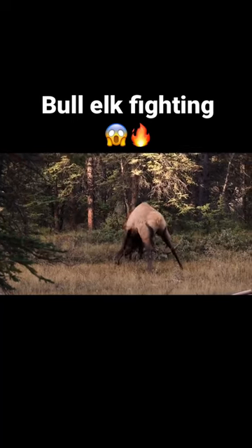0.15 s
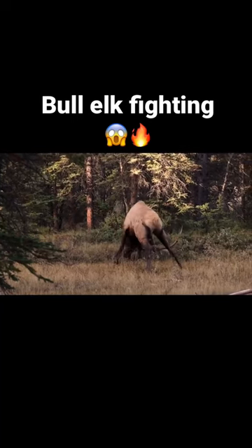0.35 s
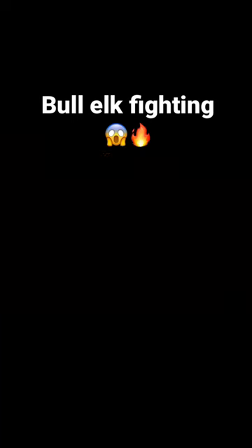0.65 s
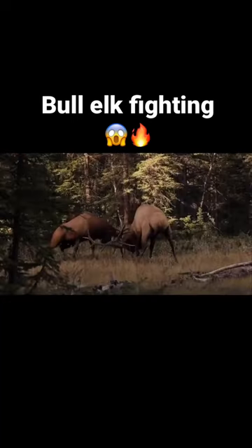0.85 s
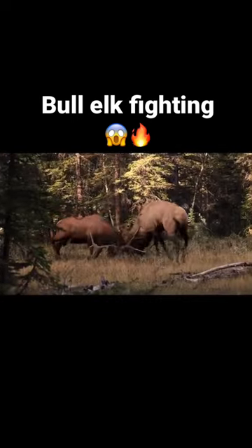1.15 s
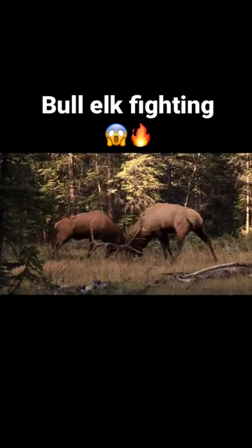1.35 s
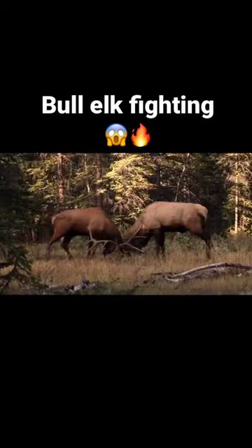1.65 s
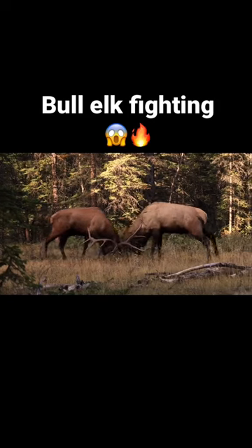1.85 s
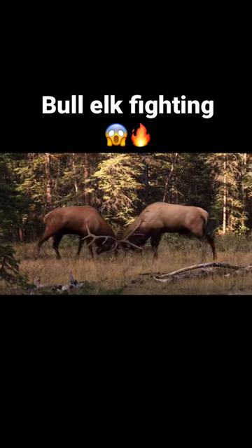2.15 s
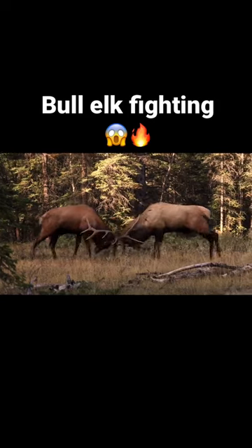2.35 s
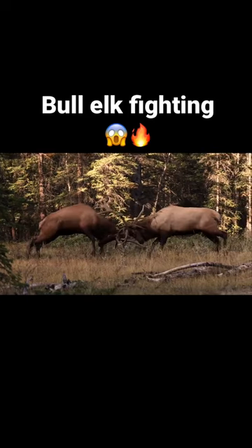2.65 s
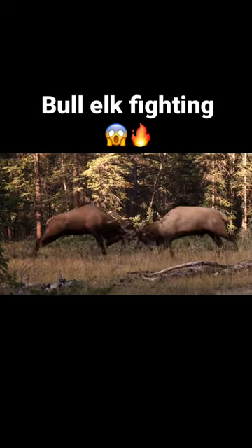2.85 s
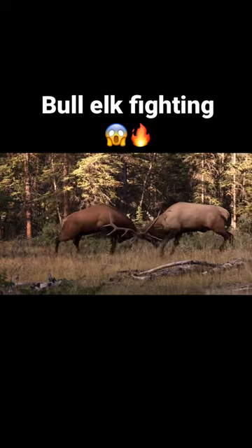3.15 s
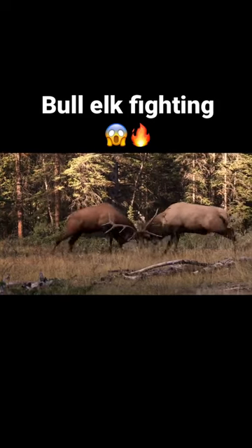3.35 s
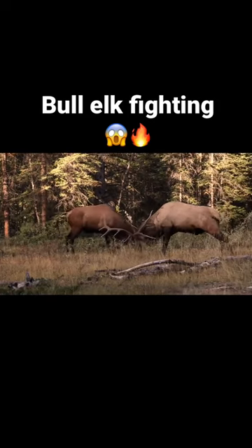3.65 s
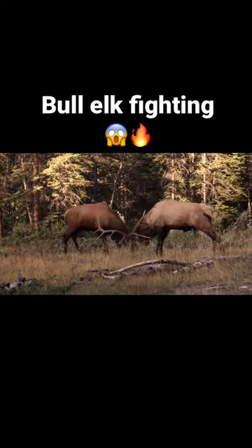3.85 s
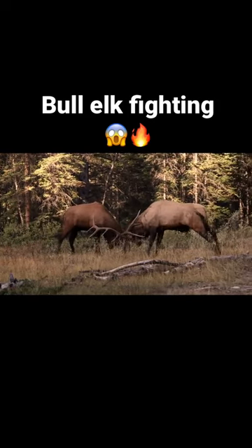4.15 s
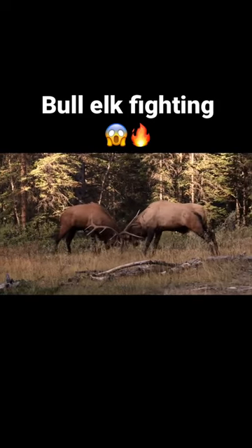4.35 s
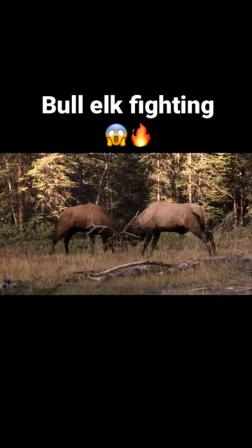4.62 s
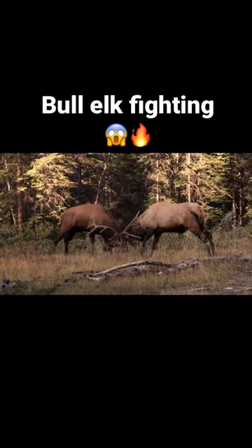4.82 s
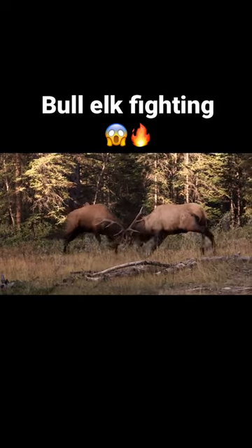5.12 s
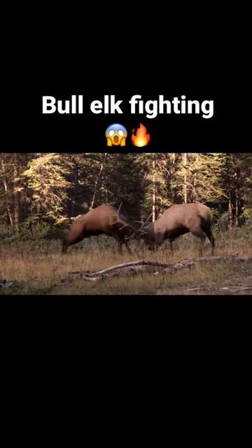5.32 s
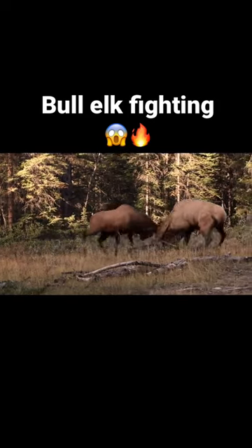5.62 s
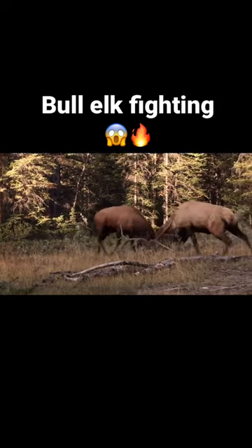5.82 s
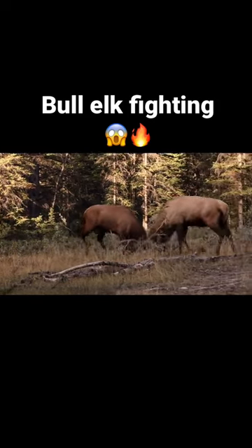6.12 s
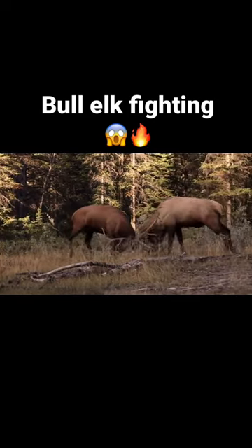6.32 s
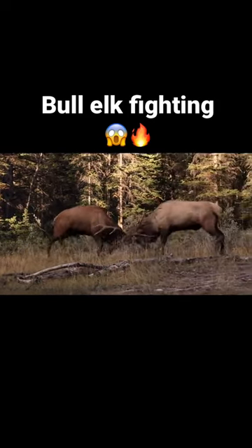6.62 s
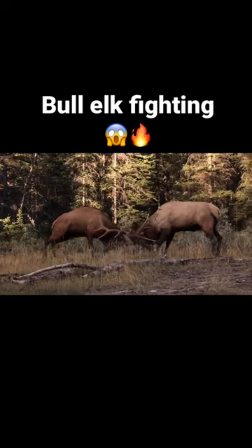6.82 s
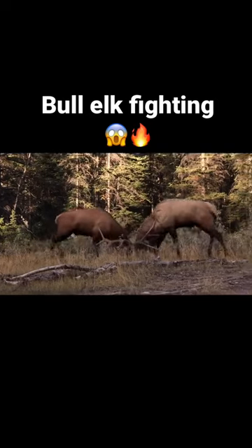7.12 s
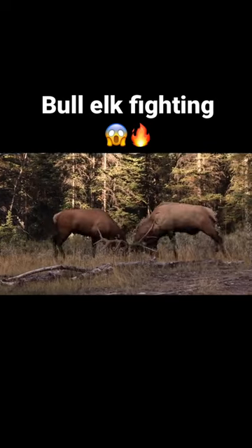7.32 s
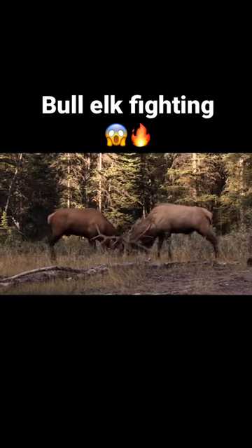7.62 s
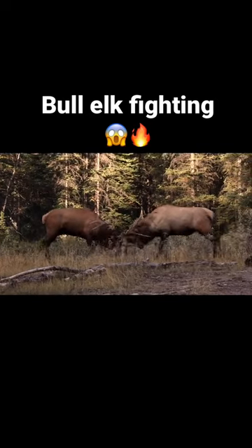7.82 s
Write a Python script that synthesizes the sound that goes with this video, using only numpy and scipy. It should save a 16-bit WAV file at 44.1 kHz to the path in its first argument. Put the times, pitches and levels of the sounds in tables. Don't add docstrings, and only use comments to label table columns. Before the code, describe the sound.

Two bull elk spar with locked antlers, hard bony clacks and rattles bursting in clusters, echoing off forest trees over faint grass rustle and low rumble.

```python
import sys
import numpy as np
from scipy import signal
from scipy.fft import rfft, irfft
from scipy.io import wavfile
from scipy.ndimage import uniform_filter1d

SR = 44100
rng = np.random.default_rng(int(sys.argv[2]) if len(sys.argv) > 2 else 0)


def boost_factor(decibels):
    exponent = np.asarray(decibels, float) / 20
    return 10 ** exponent


def dump_mix(stems):
    frames = np.atleast_2d(stems).T
    limited = np.clip(frames, -1, 1)
    pcm = np.round(limited * 32767).astype(np.int16)
    wavfile.write(sys.argv[1], SR, pcm)


N = 351477


def rms_one(x):
    return x / np.sqrt(np.mean(x ** 2) + 1e-20)


def at_hz(points, hz):
    points = np.array(points)
    return np.interp(np.log(hz), np.log(points[:, 0]), points[:, 1])


def fall(t, t60):
    return boost_factor(-60 * t / t60)


def drift(rate):
    pole = np.exp(-80 * np.pi * rate / SR)
    white = rng.standard_normal(N // 40 + 2002)
    slow = signal.lfilter([1], [1, -2 * pole, pole * pole], white)[2000:]
    return np.interp(np.arange(N) / 40, np.arange(len(slow)), rms_one(slow))


def bands(x, low_hz, high_hz):
    edges = low_hz * 2 ** np.arange(0, np.log2(high_hz / low_hz) + 1 / 3, 1 / 3)
    for k, (low, high) in enumerate(zip(edges, edges[1:])):
        sos = signal.butter(2, [low, high], "band", fs=SR, output="sos")
        yield np.sqrt(low * high), signal.sosfilt(sos, x[k % 2])


def coloured(x, spectrum):
    hz = np.maximum(np.arange(len(x) // 2 + 1) * SR / len(x), 1)
    return irfft(rfft(x) * boost_factor(at_hz(spectrum, hz)), len(x))


def patchy(source, spectrum, low_hz, high_hz, patchy_db, rate):
    together = drift(rate / 2)
    bed = 0
    for hz, band in bands(source, low_hz, high_hz):
        flicker_db = patchy_db * (0.86 * together + drift(rate))
        bed = bed + boost_factor(at_hz(spectrum, hz) + flicker_db) * band
    return rms_one(bed)


def crackle(per_s, spread_db):
    sizes = boost_factor(spread_db * np.minimum(rng.exponential(1, (2, N)), 5))
    signs = rng.choice([-1, 1], (2, N))
    happens = rng.random((2, N)) < per_s * boost_factor(5 * drift(9)) / SR
    return rms_one(sizes * signs * happens) + rng.standard_normal((2, N))


def add(out, s, sound):
    i = round(s * SR)
    out[i:i + len(sound)] += sound[:N - i]


def ground_levels():
    # time in seconds, trampling level in dB.
    surge = [(0, -29), (.62, -39.5), (1.15, -45), (1.53, -35.5), (1.87, -37.5), (2.34, -40.5),
             (2.55, -24.5), (2.72, -42), (3.33, -32.5), (4.55, -45), (4.93, -38.5), (5.06, -26.5),
             (6.12, -34.5), (6.74, -31.5), (6.8, -38.5), (7.05, -42), (7.3, -28.5), (7.97, -29.5)]
    # start and end in seconds, hiss gain and rumble gain in dB.
    stretches = [
        (0, 0.58, 4.5, 2.5),
        (1.47, 1.85, 2, -0.5),
        (2.42, 2.605, 7, -2.5),
        (2.92, 3.15, 1.5, -1),
        (4.536, 5.298, 6, 0.5),
        (5.3, 6.74, 8.5, 5),
        (6.758, 7.24, 2, 1),
        (7.242, 7.653, 9, 7),
    ]
    t = np.arange(N) / SR
    surge_db = np.interp(t, *np.transpose(surge))
    above_rest_db = surge_db + 40
    hiss_db, ground_db = sum(np.outer(gains, (t >= start) & (t < end)) for start, end, *gains in stretches)
    rumble_db = -41.5 + 0.29 * above_rest_db + uniform_filter1d(ground_db, size=1000)
    grass_db = -63 + 0.1 * above_rest_db + uniform_filter1d(hiss_db, size=1000)
    return rumble_db, surge_db, grass_db


def far_rumble(level_db):
    # frequency in Hz, spectral density in dB per Hz.
    rumble_colour = [(20, -6.5), (50, -8.5), (110, 0.5), (140, -3.5), (400, -5.5), (700, -10),
                     (1500, -33.5)]
    noise = rng.standard_normal((2, N))
    return boost_factor(level_db) * patchy(noise, rumble_colour, 20.06, 1500, patchy_db=3.0, rate=13)


def trampling(level_db):
    # frequency in Hz, spectral density in dB per Hz.
    trample_colour = [(400, -23.5), (800, -3), (1700, -5), (2300, -11.5), (4000, -12), (4700, -76)]
    crunch = crackle(700, 2.3)
    return boost_factor(level_db - 8) * patchy(crunch, trample_colour, 388.3, 4600, patchy_db=2.6, rate=9.7)


def grass_hiss(level_db):
    # frequency in Hz, spectral density in dB per Hz.
    grass_colour = [(4200, 0), (5000, -0.5), (6500, 1), (8000, -3.5), (10000, -3.5)]
    rustle = crackle(1800, 1.8)
    return boost_factor(level_db - 4) * patchy(rustle, grass_colour, 4200, 10500, patchy_db=0.3, rate=14)


def light_touches(rows, t60, crack_db):
    return [(s, db, hz, hz * (1.55 if hz < 2250 else 0.67), t60, crack_db) for s, db, hz in rows]


def shaft_blows(rows):
    rebounds = [(s + 0.016, db - 10.5, 0.92 * hz, 0.92 * other_hz, t60)
                for s, db, hz, other_hz, t60 in rows]
    return [(*row, -36 + row[1]) for row in rows + rebounds]


def grinding_slips(rows):
    slip_s, spread_db, pitch_spread = 0.0225, 3, 0.14
    slips = []
    for (s, length, db, hz), luck in zip(rows, rng.uniform(-1, 1, (len(rows), 8, 2))):
        for late, (a, b) in zip(np.arange(0, length, slip_s), luck):
            slips.append((s + late, db + spread_db * a, hz * (1 + pitch_spread * b)))
    return slips


def contacts():
    # time in seconds, peak in dB, ring in Hz.
    taps = [(.11, -16, 1665), (.154, -13, 990), (.491, -21.5, 786), (1.343, -20.5, 2130),
            (1.935, -24.5, 1530), (2.363, -22.5, 1660), (2.544, -18.5, 1790), (2.984, -24.5, 1405),
            (3.024, -19.5, 1160), (3.085, -14.5, 980), (3.178, -14, 1440), (3.279, -4, 1700),
            (4.06, -28, 900), (4.386, -28, 1107), (4.83, -30.5, 2230), (5.41, -16, 1350), (5.545, -9, 2394),
            (2.468, -11, 2250), (5.613, -13, 1390), (5.884, -16, 2430), (6.1, -17.5, 1510),
            (6.143, -12.5, 1260), (6.463, -27, 1000), (6.75, -22, 1450), (6.962, -24, 1106),
            (7.034, -23, 1670), (7.109, -18.5, 1357), (7.148, -21, 1050), (7.845, -23.5, 1374)]
    # time in seconds, peak in dB, ring in Hz.
    ticks = [(.194, -27.5, 2780), (.703, -26.5, 3040), (.734, -29.5, 3190), (.745, -27.5, 3710),
             (1.494, -23, 1460), (1.516, -34, 1500), (1.66, -16, 1834), (2.049, -22, 1812),
             (2.35, -26, 1155), (2.919, -18.5, 1485), (3.353, -19.5, 1360), (4.679, -29.5, 3220),
             (5.633, -13.5, 1270), (5.922, -19.5, 750), (6.13, -15.5, 924), (6.475, -28, 940),
             (6.585, -26, 1780), (6.691, -20.5, 3060), (6.706, -28.5, 910), (6.73, -18.5, 3236),
             (7.135, -23.5, 1124), (7.548, -20.5, 1270)]
    # start and length in seconds, peak in dB, ring in Hz.
    rattles = [
        (1.368, .08, -18.5, 2120),
        (2.488, .03, -15.5, 1840),
        (5.022, .03, -15, 1435),
        (5.504, .03, -11, 820),
        (7.425, .03, -13.5, 1120),
        (7.668, .03, -19.5, 1310),
        (7.759, .055, -18, 1290),
    ]
    # time in seconds, peak in dB, ring of one tine
    # and of the other in Hz, t60 in seconds.
    knocks = [(1.46, 0.5, 2900, 2470, 0.025), (1.619, -7.5, 1480, 2140, 0.038),
              (2.423, -4, 1980, 3565, 0.075), (3.207, -7.5, 1800, 1154, 0.093),
              (3.274, -0.5, 1656, 2840, 0.038), (5.247, -13, 1630, 565, 0.022),
              (5.359, -12.5, 2460, 1540, 0.018), (5.422, -2, 2036, 2730, 0.045),
              (5.469, -2, 2160, 1570, 0.033), (5.566, -8, 1678, 747, 0.055),
              (5.777, -10.5, 2060, 1480, 0.031), (7.29, -9, 2157, 820, 0.077),
              (7.303, -5, 1170, 1770, .075), (7.368, -7.5, 1440, 2080, 0.052),
              (7.391, -7, 1185, 2230, 0.058), (7.612, -8, 1374, 3090, 0.023)]
    # time in seconds, peak in dB, ring of one tine
    # and of the other in Hz, t60 in seconds.
    snaps = [(3.227, 2.5, 2056, 3310, 0.033), (4.901, 2.5, 3770, 1690, .03), (4.946, -9, 1510, 1930, .021),
             (4.958, -1, 2115, 1560, 0.011), (4.965, -2, 2150, 1360, 0.057), (4.984, -7, 1440, 2810, 0.042),
             (5.724, 2.5, 1694, 1250, 0.02), (5.902, -3.5, 2930, 1700, 0.026),
             (7.317, -2, 1056, 3110, 0.0986), (7.335, -3.5, 1190, 2230, .022),
             (7.352, -6.5, 3710, 2200, 0.033), (7.569, -2.5, 3350, 1480, 0.034),
             (7.587, -2, 1390, 2770, 0.047), (7.598, -5.5, 1280, 1990, 0.025)]
    # time in seconds, peak in dB, ring in Hz.
    twigs = [
        (4.726, -28, 2970),
        (4.756, -28.5, 2520),
        (5.289, -32, 1510),
        (6.925, -23.5, 1470),
        (7.828, -34, 2000),
    ]
    return ([(*row, -31.5) for row in snaps] + shaft_blows(knocks)
            + light_touches(ticks, 0.051, -34.5) + light_touches(taps, 0.041, -48)
            + light_touches(twigs, 0.0087, -17)
            + light_touches(grinding_slips(rattles), 0.087, -42.5))


def tine_rings(t, hz, other_hz, draw):
    stray_hz = 700 * 5.5 ** draw[:3]
    stray_level = boost_factor(-3.5 - 12 * draw[3:6])
    stray = stray_level @ np.sin(2 * np.pi * (stray_hz[:, None] * t + draw[6:, None]))
    return np.sin(2 * np.pi * hz * t) + boost_factor(-12.5) * np.sin(2 * np.pi * other_hz * t) + stray


def bone_splinter(rough, hz, other_hz):
    # frequency in Hz, level in dB.
    bone_colour = [(150, -34), (500, -5.5), (900, -5.5), (1500, -2), (2200, -8), (3000, -8.5),
                   (4000, -11.5), (4700, -29), (9000, -48)]
    near_tines = sum(signal.lfilter(*signal.iirpeak(f, 3.0, fs=SR), rough) for f in (hz, other_hz))
    return rms_one(coloured(rough + near_tines, bone_colour))


def onset_crack(t, sharp, chatter, t60):
    # frequency in Hz, level in dB.
    crack_colour = [(3600, -34), (4600, -0.5), (6500, -1.5), (8000, -8), (10500, -16.5)]
    snap = fall(t, 0.01) + boost_factor(-3) * chatter * fall(t, np.clip(1.6 * t60, .005, .1))
    return coloured(sharp, crack_colour) * snap


def antlers():
    out, t, hits = np.zeros((2, N)), np.arange(SR // 8) / SR, contacts()
    dull = signal.butter(6, 4500, "low", fs=SR, output="sos")
    luck, noise = rng.random((len(hits), 9)), rng.standard_normal((len(hits), 3, len(t)))
    for (s, peak_db, hz, other_hz, t60, crack_db), draw, (rough, sharp, lumps) in zip(hits, luck, noise):
        load_s = 0.00024 + 0.011 * t60 + 0.00005 * max(-peak_db, 0)
        rise = 1 - np.exp(-t / load_s)
        chatter = boost_factor(4.5 * rms_one(uniform_filter1d(lumps, size=50)))

        rings = tine_rings(t, hz, other_hz, draw) * rise * fall(t, np.clip(0.94 * t60, .008, .06))
        rings = signal.sosfilt(dull, rings)

        thin = signal.butter(2, 0.52 * min(hz, other_hz), "high", fs=SR, output="sos")
        splinter = bone_splinter(rough, hz, other_hz) * chatter * fall(t, np.clip(1.8 * t60, .008, .2))
        splinter = boost_factor(-7) * signal.sosfilt(np.vstack([dull, thin]), splinter * rise)

        crack = boost_factor(crack_db + 10.5) * onset_crack(t, sharp, chatter, t60)
        height = np.abs(rings + splinter).max()
        add(out[0], s - 0.916 * load_s, boost_factor(peak_db) * (rings + splinter) / height)
        add(out[0], s, boost_factor(peak_db) * crack)
        to_trees = (0.61 * rings + 1.12 * splinter) / height + boost_factor(2.5) * crack
        add(out[1], s, boost_factor(peak_db) * to_trees)
    return out


def thuds():
    # time in seconds, peak in dB, ring in Hz, t60 in seconds.
    beams = [(.156, -16.5, 283, 0.12), (1.345, -24.5, 445, 1), (1.41, -25, 446, .4),
             (1.615, -25.5, 296.5, 0.38), (2.057, -24.5, 418.5, 0.31), (2.487, -19, 380, .16),
             (2.919, -24, 330, 0.073), (3.083, -20, 458, 0.083), (3.172, -20.5, 427, 0.99),
             (3.27, -11, 411.8, 0.19), (3.315, -17.5, 420, 0.28), (4.049, -24.5, 348, .17),
             (4.898, -24, 238.5, 0.68), (4.959, -9, 290.7, 0.24), (5.105, -21, 216, 0.089),
             (5.24, -19.5, 285, 0.089), (5.355, -16, 315, 0.99), (5.402, -11.5, 238, 0.27),
             (5.52, -10.5, 477, 0.29), (5.563, -4.5, 285, 0.05), (5.619, -15, 310, 0.17),
             (5.921, -11, 381, 0.13), (6.145, -14.5, 283, 0.074), (7.285, -10, 266, .25),
             (7.313, -9.5, 375, 0.27), (7.337, -10, 314, 0.27), (7.453, -15.5, 386, 0.089),
             (7.589, -12.5, 400, 0.19), (7.771, -21, 376, 0.32)]
    # time in seconds, peak in dB, ring in Hz.
    hooves = [(0.373, -26.5, 137), (0.482, -18.5, 111), (2.419, -20, 170), (3.665, -32, 120),
              (4.384, -24, 82.6), (4.446, -39, 151), (4.559, -29, 80.4), (4.679, -19.5, 110),
              (5.173, -22.5, 185), (5.375, -19.5, 227), (5.715, -18, 199), (5.814, -18.5, 117),
              (6.361, -22.5, 130), (6.469, -18.5, 115), (6.532, -23, 138), (6.579, -24.5, 205),
              (6.688, -31, 145), (6.978, -18.5, 143), (7.122, -16.5, 120)]
    hoof_t60_s = 0.12
    out, t = np.zeros(N), np.arange(SR // 3) / SR
    for s, peak_db, hz, t60 in beams + [(*row, hoof_t60_s) for row in hooves]:
        phase = 2 * np.pi * hz * (t + 0.0017 * (1 - np.exp(-t / 0.0084)))
        around = signal.butter(2, [0.44 * hz, 1.76 * hz], "band", fs=SR, output="sos")
        puff = rms_one(signal.sosfilt(around, rng.standard_normal(len(t))))
        neighbour = np.sin(phase * (1.3 + 0.66 * rng.random()))
        body = np.sin(phase) + 0.18 * neighbour + 0.88 * puff
        body = body * (1 - np.exp(-t / 0.0027)) * fall(t, np.clip(t60, .03, .4))
        add(out, s, boost_factor(peak_db) * body / np.abs(body).max())
    return signal.sosfilt(signal.butter(4, 60, "high", fs=SR, output="sos"), out + 1e-18)


def forest(x):
    # frequency in Hz, t60 in seconds.
    forest_t60 = [(150, 1.86), (400, 0.64), (1000, 2.8), (1800, 1.37), (3000, 0.98), (5000, 0.54),
                  (6500, 0.35), (9000, 1.04)]
    # frequency in Hz, level in dB.
    forest_colour = [(150, 2.5), (400, -7.5), (1000, -4), (1800, 0.5), (3000, 0), (5000, 9), (9000, -2.5)]
    wash_db, nearest_tree_s, swell_s = -14.5, 0.0017, 0.027
    t = np.arange(2 * SR) / SR
    late = np.maximum(t - nearest_tree_s, 0)
    lumps = boost_factor(2.8 * drift(40)[:len(t)])
    echoes = rng.standard_normal((2, len(t))) * (1 - np.exp(-late / swell_s)) * lumps
    tail = sum(boost_factor(at_hz(forest_colour, hz)) * band * fall(late, at_hz(forest_t60, hz))
               for hz, band in bands(echoes, 100.3, 11000))
    return boost_factor(wash_db) * signal.fftconvolve(x, tail / np.sqrt(np.sum(tail ** 2)))[:N]


def scene():
    rumble_db, trample_db, grass_db = ground_levels()
    ground = far_rumble(rumble_db) + trampling(trample_db) + grass_hiss(grass_db)
    clacks, scattered = antlers()
    knocks = thuds()
    return (clacks + knocks + forest(scattered + knocks) + ground)[None]


def top_cut(x):
    return signal.sosfilt(signal.butter(12, 15600, fs=SR, output="sos"), x)


def record(dry):
    low_pass = signal.cheby2(14, 55, 10400, fs=SR, output="sos")
    cut = signal.sosfilt(low_pass, dry)
    return top_cut(np.clip(cut, -1, 1))


dry = scene()
out = record(dry)
dump_mix(out)
```